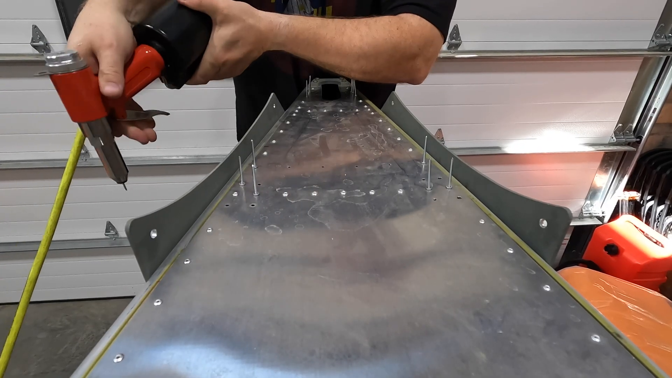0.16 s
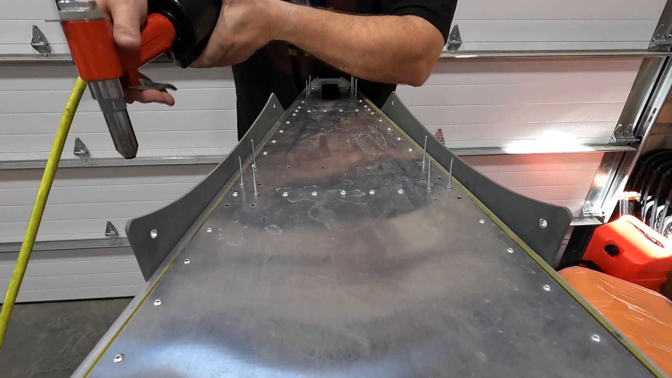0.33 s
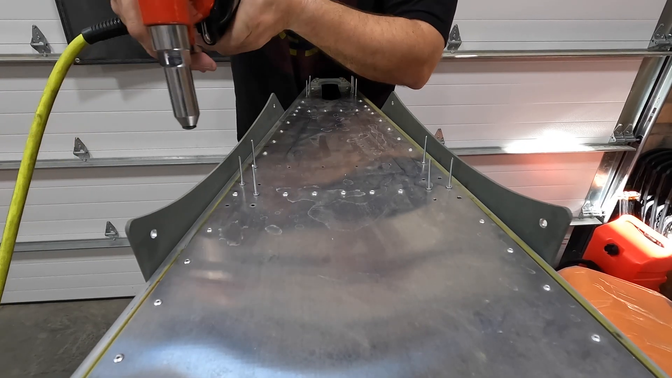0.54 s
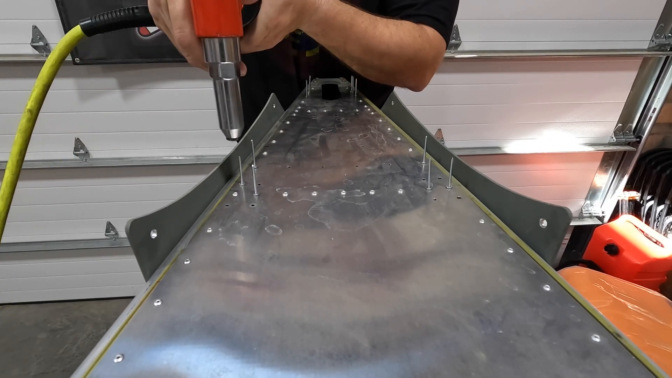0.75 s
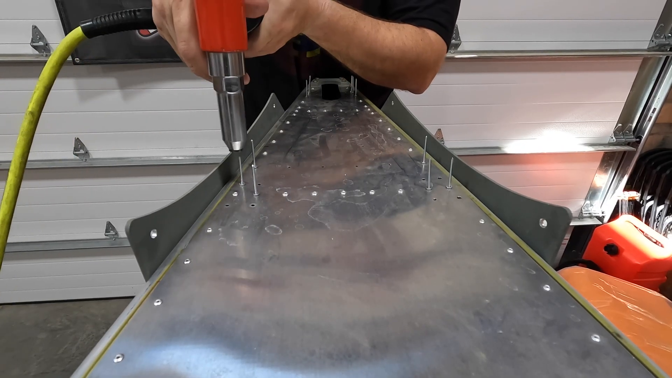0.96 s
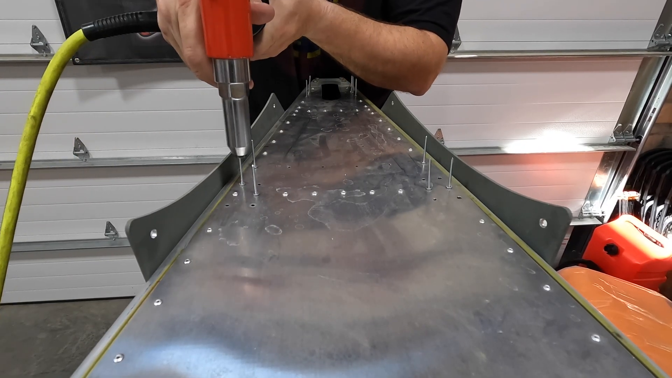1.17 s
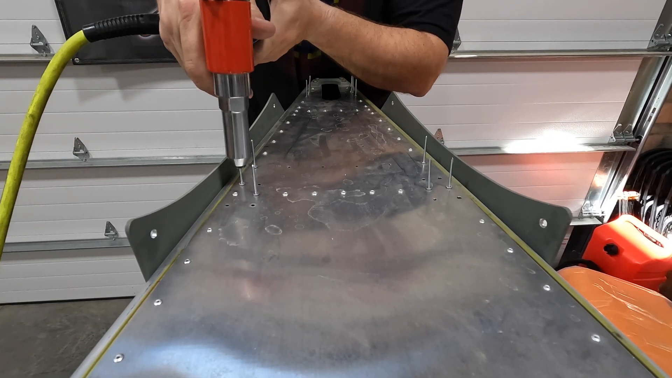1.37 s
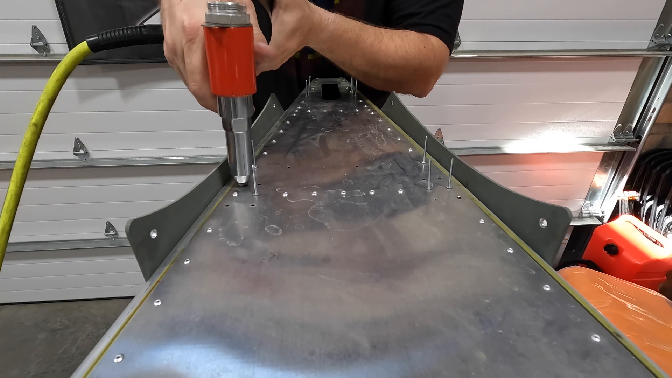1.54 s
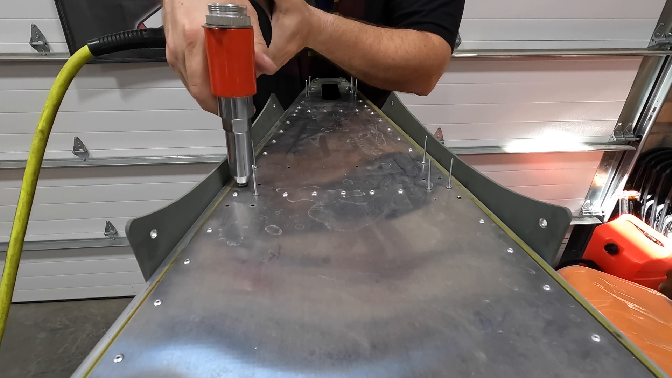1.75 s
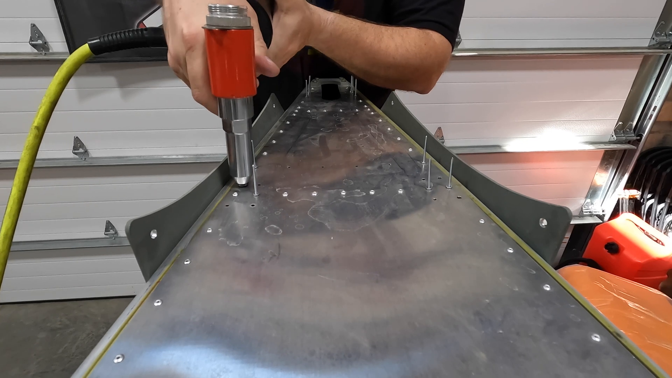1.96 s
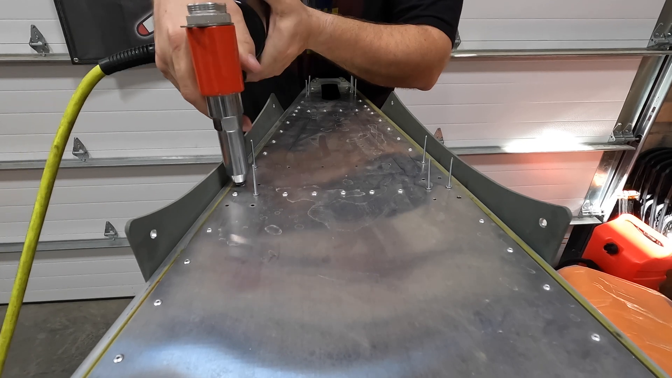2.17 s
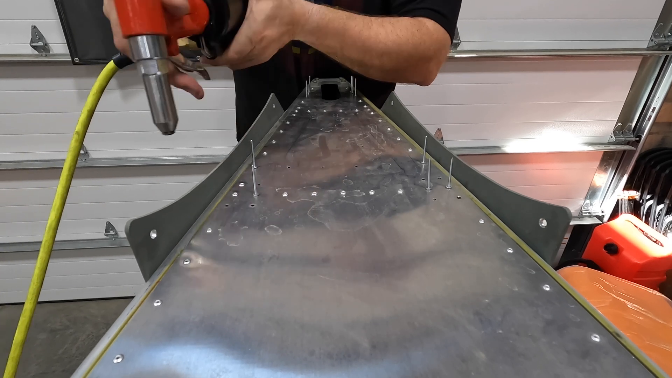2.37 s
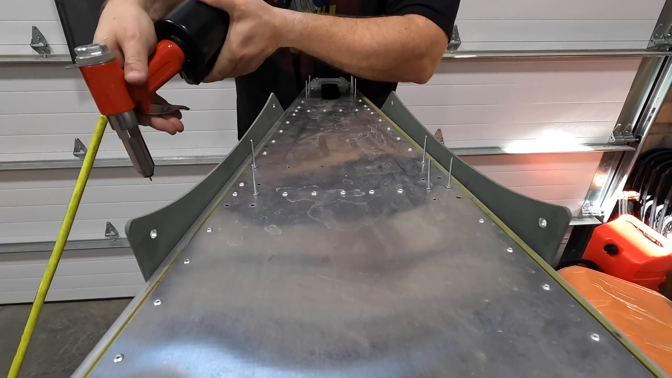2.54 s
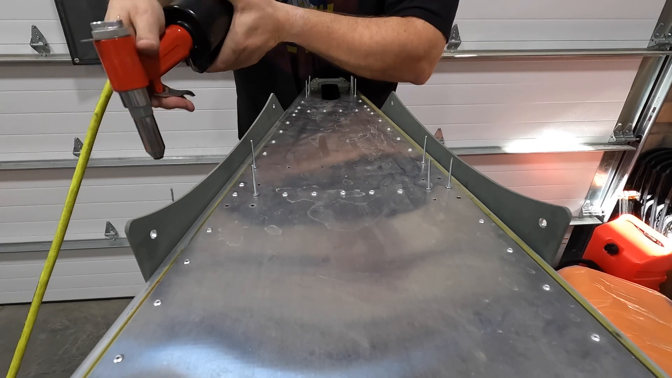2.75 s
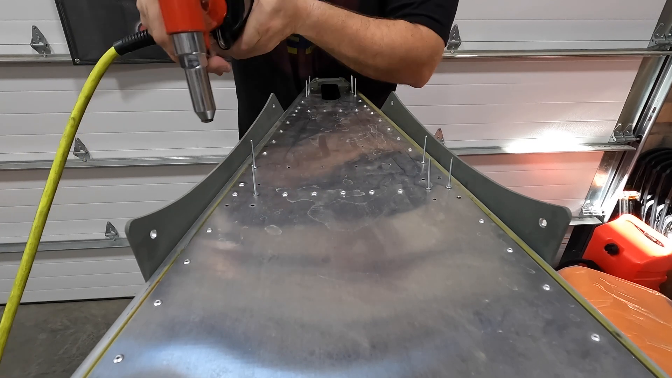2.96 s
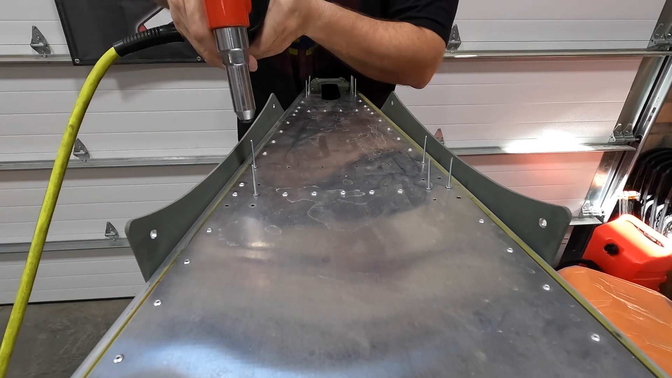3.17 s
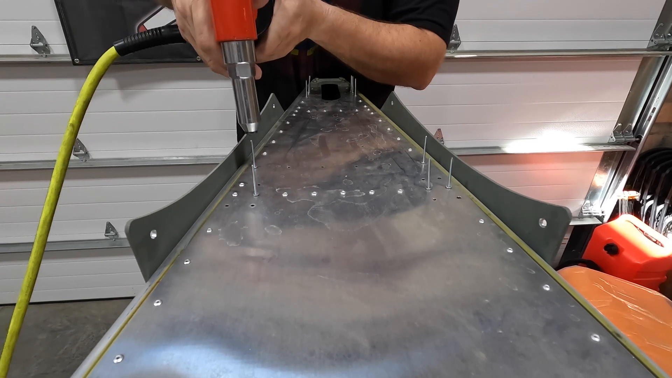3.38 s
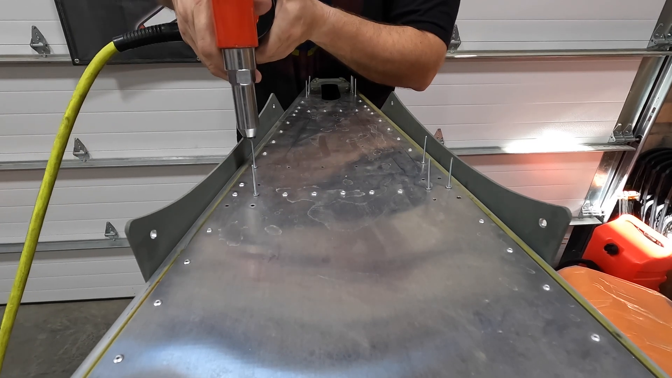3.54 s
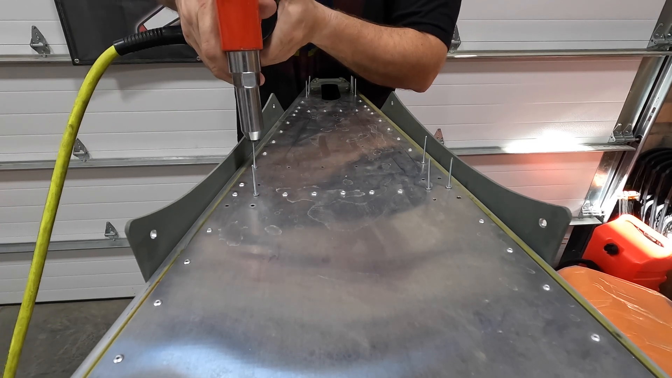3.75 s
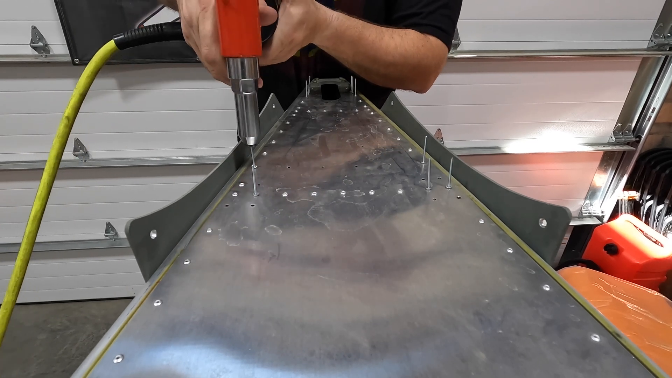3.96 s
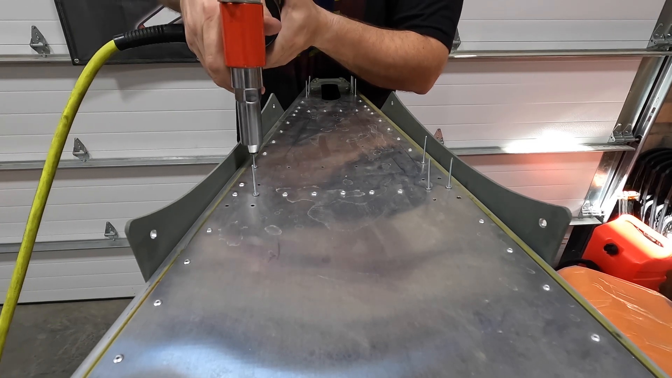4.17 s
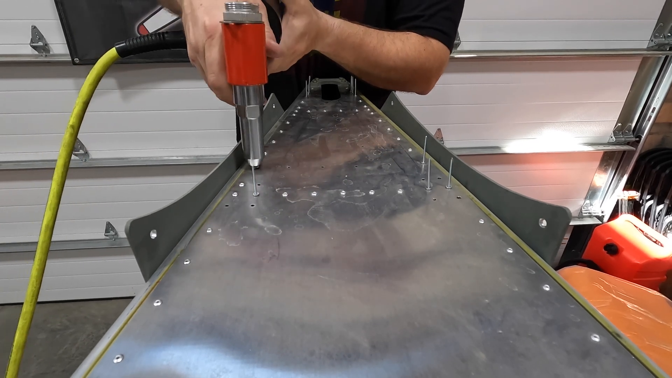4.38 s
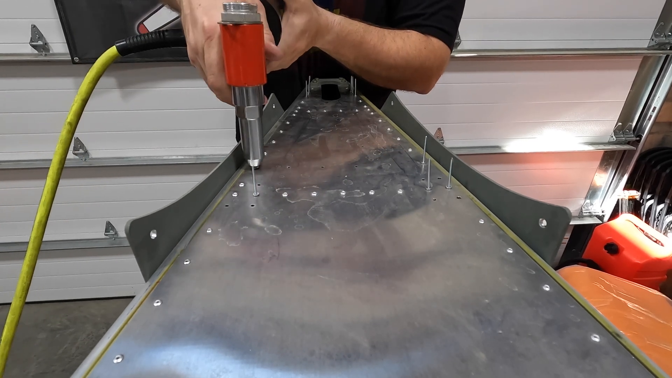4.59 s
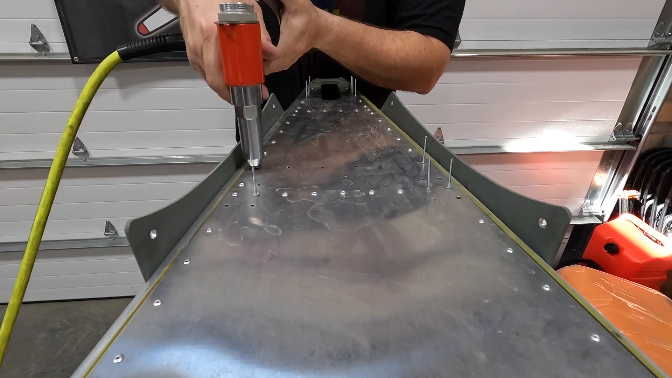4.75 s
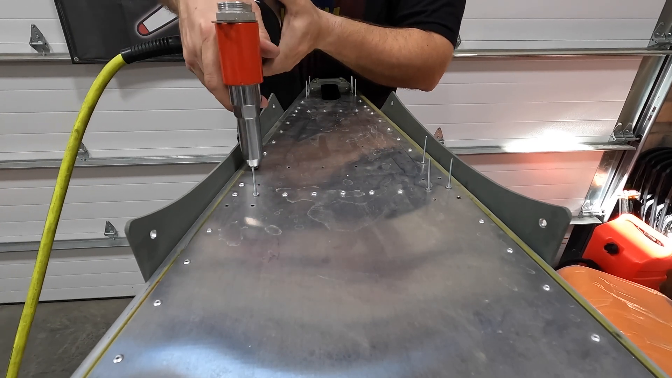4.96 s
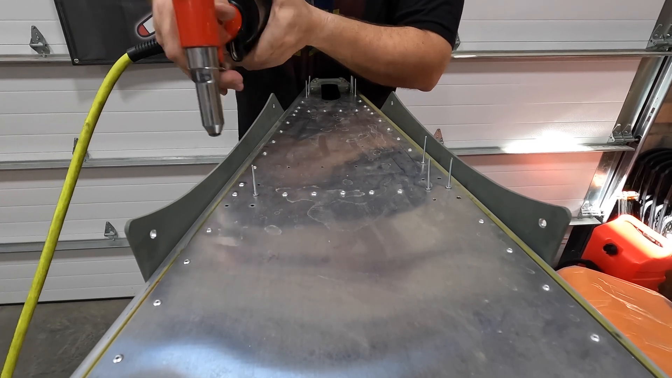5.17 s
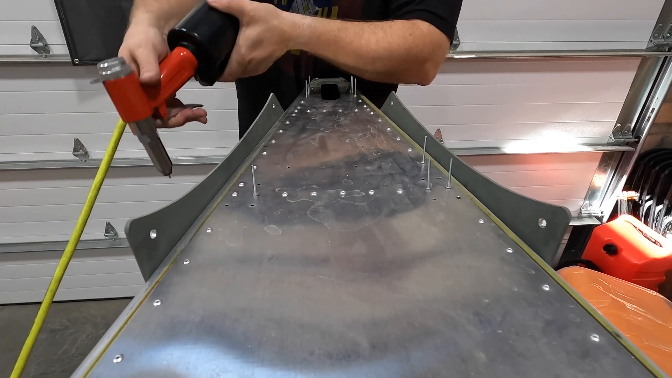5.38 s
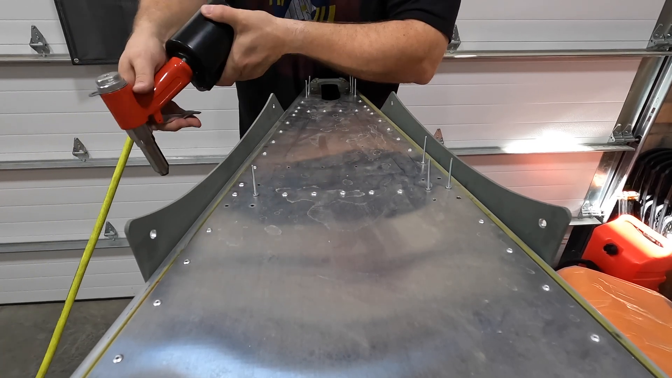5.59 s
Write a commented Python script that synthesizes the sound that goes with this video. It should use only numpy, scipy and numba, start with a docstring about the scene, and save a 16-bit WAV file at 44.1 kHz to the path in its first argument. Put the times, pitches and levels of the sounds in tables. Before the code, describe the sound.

Close metallic taps, two sharp booming rivet snaps with hissing air exhausts, and a steady low machine hum behind in a workshop.

```python
"""In a workshop a pneumatic riveter, still hissing from its last pull, sets two more rivets in a large aluminium sheet.
Close by, the nose knocks on the sheet before each pull, with one faint extra touch between the two.
On a pull air drives the piston, the mandrel snaps, the cylinder vents and a thin hiss lingers.
Struck modes make the metal, shaped noise the air, and shaft harmonics the pump that hums quieter to the left.
The camera's gain control ducks at the loud blows and lets the hum creep back up."""
import sys
import numpy as np
from scipy import signal
from scipy.fft import rfft, irfft
from scipy.io import wavfile
from scipy.ndimage import uniform_filter1d
from numba import njit

SR = 44100
rng = np.random.default_rng(int(sys.argv[2]) if len(sys.argv) > 2 else 0)


def to_wav(s):
    """Save 16-bit WAV."""
    ch = np.atleast_2d(s).T  # columns
    pcm = np.round(np.clip(ch, -1, 1) * 32767)  # PCM
    wavfile.write(sys.argv[1], SR, pcm.astype(np.int16))


N = 247842
T = np.arange(N) / SR
FREQ = np.fft.rfftfreq(N, 1 / SR)

# Levels in the tables are relative within each source.
# trigger pulls, the first already dying away: mandrel snap t/s, crack level/dB, body ring level/dB,
# brightness f/Hz, mandrel ping level/dB, groan level/dB, piston kick level/dB, jaw grip level/dB,
# recoil level/dB, clank level/dB, valve shutting level/dB, stroke air level/dB, vent level/dB,
# vent hold t/s, leak level/dB
PULLS = [(-0.305, -3, -12, 11000, -10.5, -29, -1, -5, -4.5, -20, -39, -20, -26.5, 0.11, -35),
         (2.183, -2.5, 4.5, 11700, -28, -16.5, -7.5, -18, -6.5, -23, -18.5, -16.5, -14, 0.097, -33),
         (5.0231, -0.5, 1.5, 10300, 8, -11.5, -7, -10.5, -9, -12, -21.5, -15, -14.5, 0.12, -30.5)]
# the nose lands and bounces once: t/s, crack level/dB, body ring level/dB, bounce level/dB,
# clank level/dB, boom level/dB
LANDINGS = [(1.703, -20.5, -28, -3, -17, -15), (3.864, -57, -57, -14, -36, -32),
            (4.4845, -19.5, -12.5, -2.5, -14, -15)]
# light ticks before the first landing, then a last contact of the nose as it settles:
# t/s, crack level/dB, body ring level/dB, brightness f/Hz
LIGHT_CONTACTS = [(0.503, -38, -55, 12000), (1.335, -33, -27, 7500), (1.35, -32, -30, 7500),
                  (1.7122, -23.5, -19, 5500)]
# every pull: stroke before the snap, release after the snap, valve shutting after the release
STROKE_S, RELEASE_S, SETTLE_S = .087, .069, .576
BOUNCE_S = 0.0076  # from a landing to its bounce


def undb(db):
    """Decibels to gain."""
    return 10 ** (np.asarray(db) / 20)


def level(x, db):
    """Scale to an rms level."""
    return x * undb(db) / np.sqrt(np.mean(x ** 2))


def gains(points):
    """Gain of an (f/Hz, level/dB) spectrum at every frequency, falling away below it and level above."""
    hz, db = np.transpose(points)
    shape = undb(np.interp(np.log(FREQ + 1), np.log(hz), db))
    return shape * np.minimum(FREQ / hz[0], 1) ** 2


def colour(x, points):
    """Give a signal a spectrum, at unit rms."""
    return level(irfft(rfft(x) * gains(points), N), 0)


def noise(points):
    """Fresh noise with a spectrum, at unit rms."""
    return colour(rng.standard_normal(N), points)


def band(hz, width_hz):
    """Noise in one resonance, at unit rms; its centre may move."""
    lowpass = signal.butter(2, width_hz / 2, fs=SR, output="sos")
    slow = signal.sosfilt(lowpass, rng.standard_normal((2, N)))
    angle = 2 * np.pi * np.cumsum(hz * np.ones(N)) / SR
    return level(slow[0] * np.cos(angle) + slow[1] * np.sin(angle), 0)


def fade(t60, size=SR):
    """Exponential decay, down 60 dB after t60 seconds."""
    return np.exp(-np.log(1000) * T[:size] / t60)


def ring(modes):
    """One second of modes (f/Hz, level/dB, t60/s) struck together."""
    return sum(undb(db) * fade(t60) * np.sin(2 * np.pi * hz * T[:SR]) for hz, db, t60 in modes)


def add(track, s, sound):
    """Mix a sound into a track at a time, which may lie before the start."""
    i = int(s * SR)
    part = sound[max(-i, 0):max(N - i, 0)]
    track[max(i, 0):max(i, 0) + len(part)] += part


def walk(rate):
    """Slow random wander, with about rate independent values a second."""
    k = int(SR / rate)
    return uniform_filter1d(np.repeat(rng.standard_normal(N // k + 1), k), k)[:N]


def gate(start, end, ramp_s):
    """A valve that starts to open at one time and to close at another."""
    return np.clip((T - start) / ramp_s, 0, 1) * np.clip(1 - (T - end) / ramp_s, 0, 1)


def pump(hum_db=-27.0, whine_db=-36.5, clatter_db=-37.5, rush_db=-34, wobble=.004, throb=0.034,
         scatter=1.0, treble_hz=3000, shaft_hz=28.256):
    """Shaft harmonics, a casing whine that swells once a turn, clatter repeating each turn, and rushing air."""
    # shaft harmonics, then casing whine: multiple of the shaft rate, level/dB
    hum_partials = [(1, -11), (2, 3), (3, -7), (4, 0.5), (5, -8), (6, -6), (7, -25), (8, -5), (9, -12),
                    (10, -7.5), (11, -7.5), (12, -24), (13, -8.5), (14, 2), (15, -7.5), (16, -11.5),
                    (17, -13.5), (18, -9), (19, -13.5), (20, -16.5), (21, -25.5)]
    whine_partials = [(40, 1.5), (44, -3), (46, 6.5), (47, 1), (48, 5.5), (49, 7.5), (50, 4.5), (51, 2),
                      (54, -18), (59, -11), (62, -5), (63, -6), (91, -8), (94, -8.5), (151, -19),
                      (165, -16)]
    # spectra of the clatter and of the rushing air: f/Hz, level/dB per Hz
    clatter_spectrum = [(500, -9.5), (650, -5), (800, -1), (1100, 5), (1500, 5), (1750, 6), (2000, 0.5),
                        (2300, -5.5), (2600, 3.5), (2900, -11), (4000, -9), (4700, -7), (5200, -19.5),
                        (7000, -22), (12000, -43)]
    rush_spectrum = [(20, -32), (45, 1.5), (78, 6.5), (150, 4), (260, -9), (650, -10), (1300, -3.5),
                     (2500, -11.5), (3000, -18), (4700, -20.5), (5200, -29.5), (7000, -27), (8200, -40),
                     (12000, -43.5), (15000, -85)]
    # treble change of clatter and rush: t/s, level/dB
    treble_curve = [(0.6, -2.5), (1.5, -0.5), (3.1, 2), (3.8, 4), (4.6, 4), (5.5, 1.5)]
    turns = shaft_hz * T + wobble * walk(3) - .6
    angle = 2 * np.pi * turns
    hum = sum(undb(db) * np.cos(round(k) * angle + 2 * np.pi * rng.random()) for k, db in hum_partials)
    # loosely aligned phases bunch the whine once a turn
    whine = sum(undb(db) * np.cos(round(k) * angle + scatter * rng.standard_normal())
                for k, db in whine_partials)
    one_turn = rng.standard_normal(int(SR / shaft_hz))
    place = (turns % 1 * len(one_turn)).astype(int) % len(one_turn)
    clatter = colour(one_turn[place], clatter_spectrum)
    rush = noise(rush_spectrum) * (1 + throb * np.cos(angle)) * undb(0.038 * walk(3.2))
    bed = level(clatter, clatter_db) + level(rush, rush_db)
    treble = irfft(rfft(bed) * FREQ ** 4 / (FREQ ** 4 + treble_hz ** 4), N)
    bed = bed + treble * (undb(np.interp(T, *np.transpose(treble_curve))) - 1)
    return level(hum, hum_db) + level(whine, whine_db) * undb(0.24 * walk(9.6)) + bed


def workshop(x, t60=0.57):
    """Diffuse reflections, as a decaying coloured noise tail that starts 4 ms after the direct sound."""
    spectrum = [(60, 4.0), (2500, 3.5), (7000, -4.5), (15000, 2.0)]
    tail = noise(spectrum)[:SR] * fade(t60) * (T[:SR] > .004)
    return signal.fftconvolve(x, tail / np.linalg.norm(tail))[:N]


def strain(rise_s=0.059, fall_db_per_s=45, creak_db=-5, creak_hz=720, creak_width_hz=110,
           sag_per_s=6.0, creak_fall_db_per_s=70):
    """The sheet groans while the rivet swells in its hole, with a creak that sinks in pitch."""
    # groan of the sheet under the pull: f/Hz, level/dB per Hz
    groan_spectrum = [(80, 9), (110, -5), (165, 2.5), (230, 7), (320, 0), (420, -5.5), (530, -3.5),
                      (700, -17.5), (1100, -12.5), (1800, -26), (3000, -33)]
    load, creak = np.zeros((2, N))
    for s, _, _, _, _, groan_db, *_ in PULLS:
        trigger = s - STROKE_S
        age = np.clip(T - trigger, 0, STROKE_S + rise_s)
        pull = gate(trigger, s, rise_s) * undb(groan_db - fall_db_per_s * age)
        load += pull
        sinking = band(creak_hz * np.exp(-sag_per_s * age), creak_width_hz)
        creak += pull * undb(creak_db - creak_fall_db_per_s * age) * sinking
    return noise(groan_spectrum) * load + creak


def thumps(overtone_ratio=1.6, overtone_db=-15):
    """The panel flexes in round thumps, some short, some droning on as the sheet groans under the pull."""
    # the panel flexes as the tool seats, pulls and jumps: t/s, f/Hz, level/dB, t60/s
    flexes = [(1.7209, 153, -10.5, 0.17), (1.755, 126, -17, .18), (2.1, 116.6, -9.5, 0.22),
              (2.1939, 148.4, -3.5, 0.1), (2.216, 171.7, -9.5, 0.78), (4.4908, 157.7, -9.5, 0.12),
              (4.513, 166, -11, 0.18), (4.588, 116, -16, 0.17), (4.949, 177.6, -7.5, 0.69),
              (4.983, 112, -11, 0.2), (5.033, 160, -7.5, 0.28)]
    out = np.zeros(N)
    for s, hz, db, t60 in flexes:
        add(out, s, undb(db) * ring([(hz, 0, t60), (hz * overtone_ratio, overtone_db, t60)]))
    return out


def shoves():
    """Pushes on the sheet (t/s, level/dB, contact/ms): landings, then each pull's kick, grip, recoil, return."""
    touch_db, touch_ms = -15.5, 0.59  # touch level is relative to the boom
    seat_s, seat_ms = 0.0029, 5.2  # the tool's weight follows the first touch
    kick_ms, grip_ms, recoil_ms, return_ms = 4.5, 1.23, 1.27, 0.76
    grip_lag_s, recoil_lag_s = 0.00935, 0.0022  # after the trigger; after the snap
    return_db = -16.5  # the piston springs back on release
    rows = []
    for s, *_, boom_db in LANDINGS:
        rows += [(s + BOUNCE_S, boom_db + touch_db, touch_ms), (s + seat_s, boom_db, seat_ms)]
    for s, _, _, _, _, _, kick_db, grip_db, recoil_db, *_ in PULLS:
        trigger = s - STROKE_S
        rows += [(trigger, kick_db, kick_ms), (trigger + grip_lag_s, grip_db, grip_ms),
                 (s + recoil_lag_s, recoil_db, recoil_ms), (s + RELEASE_S, return_db, return_ms)]
    return rows


def sheet(modes_db=-5, wash_db=-6.5, wash_t60=0.94, travel_s=0.012):
    """Shoves set the sheet booming; a longer contact favours the lower modes."""
    # sheet and frame modes: f/Hz, level/dB, t60/s
    sheet_modes = [(61.9, 1, 0.62), (76.1, -7, 1.82), (93, -3.5, 1.27), (132, -8.5, 0.85),
                   (154.3, -3.5, 1.92), (168.6, 6, 1.05), (220.4, -2.5, 0.96), (245, -12, 0.39),
                   (297.6, -2.5, 0.75), (328, -5.5, 0.69), (450, -11, 0.15), (514.4, -4, 0.3)]
    # dense low modes heard as a wash: f/Hz, level/dB per Hz
    wash_spectrum = [(25, 1), (60, -16), (130, 2.5), (190, 4.5), (260, -22), (350, -13), (550, -13),
                     (900, -16), (1500, -49), (3000, -50)]
    body = np.zeros(N)
    for k, mode in enumerate(sheet_modes):
        # bending waves are slower at low pitch; travel_s is for the lowest mode
        add(body, travel_s * sheet_modes[0][0] / mode[0], (-1) ** k * ring([mode]))
    out, wash = np.zeros(N), noise(wash_spectrum)
    for s, db, contact_ms in shoves():
        push = np.exp(-T[:SR // 20] * 1000 / (contact_ms / np.pi))
        dense = np.roll(wash, rng.integers(N))[:SR] * fade(wash_t60)
        blow = undb(modes_db) * body[:SR] + undb(wash_db) * dense
        add(out, s, undb(db) * signal.fftconvolve(blow, push / push.sum()))
    return out


def air(scatter=0.15, flutter_db=-0.05, valve_s=0.016, broad_db=-1.5, drift=.006):
    """The jet hisses in gliding resonances on stroke and vent; the valve leaks and whistles until it shuts."""
    # spectra of the jet, the leak and the whistle: f/Hz, level/dB per Hz
    jet_spectrum = [(150, 25.5), (400, 2.5), (750, -7), (1400, 3.5), (2000, 2), (2500, 2), (3900, -5),
                    (4700, -1.5), (6000, 0), (7500, -7), (8600, -10), (10300, -7), (11200, -9),
                    (13000, -17), (15500, -26)]
    leak_spectrum = [(600, -14), (1400, 10), (2000, 16.5), (2600, 17.5), (3200, 8.5), (3800, 11.5),
                     (4400, 3), (5300, 8), (6200, -10), (7600, -29), (8800, -11), (10300, -5), (12200, -5),
                     (14000, -14), (15500, -24)]
    whistle_spectrum = [(8500, -37), (10200, 6), (11000, -4), (12200, 5), (13500, -19), (15500, -26)]
    # resonances of the air jet: f/Hz, width f/Hz, level/dB
    jet_resonances = [(5430, 500, -18), (6560, 380, -19.5), (7830, 730, -14.5), (9870, 600, -20.5),
                      (12240, 550, -26.5)]
    # they shift with the way the tool is held: t/s, frequency ratio
    jet_glide = [(2.1, 1), (2.28, 0.98), (2.41, .94), (2.6, 0.94), (4.94, .86), (5.26, 0.8), (5.38, 0.93)]
    vent_rise_s, vent_fall_db_per_s = 0.0087, 124  # the vent holds, then falls fast to a slower tail
    tail_db, tail_fall_db_per_s = -11.5, 21  # tail level is relative to the vent
    leak_fall_db_per_s, shut_s = 10.5, 0.027
    whistle_db, whistle_peak_s, whistle_slope_db_per_s = -13, 0.46, 80  # level is relative to the leak
    echo_unit_ms, echo_sway = 0.4014, 0.046  # each reflection lags by a multiple of a wandering unit
    flow, leak, whistle = np.zeros((3, N))
    for s, *_, stroke_db, vent_db, hold_s, leak_db in PULLS:
        release = s + RELEASE_S
        shut = release + SETTLE_S
        age = np.clip(T - release, 0, SETTLE_S)
        vent = undb(vent_db - vent_fall_db_per_s * np.maximum(age - hold_s, 0))
        vent = vent + undb(vent_db + tail_db - tail_fall_db_per_s * age)
        flow = flow + undb(stroke_db) * gate(s - STROKE_S, s, valve_s)
        flow = flow + vent * gate(release, shut, vent_rise_s)
        ajar = gate(release, shut, shut_s)
        leak = leak + ajar * undb(leak_db - leak_fall_db_per_s * age)
        off_peak_s = np.abs(age - whistle_peak_s)
        whistle = whistle + ajar * undb(leak_db + whistle_db - whistle_slope_db_per_s * off_peak_s)
    tune = np.interp(T, *np.transpose(jet_glide)) * (1 + drift * walk(12))
    jet = undb(broad_db) * noise(jet_spectrum)
    jet = jet + sum(undb(db) * band(hz * tune, width) for hz, width, db in jet_resonances)
    hiss = jet * flow * undb(flutter_db * walk(50))
    hiss = hiss + noise(leak_spectrum) * leak + noise(whistle_spectrum) * whistle
    lag = echo_unit_ms * (1 + echo_sway * walk(4)) / 1000
    # reflections off the hands and the sheet ripple the hiss finely
    far = sum(np.interp(T - lag * times, T, hiss) for times in rng.uniform(2.04, 10.22, size=4))
    return hiss + scatter * far


def clank(s, next_hole_s=3):
    """The sheet's ring at the hole being worked at that time."""
    # depends on where the nose lands: f/Hz, level/dB at the first hole, level/dB at the second, t60/s
    hole_modes = [(657, -12, -12.5, 0.18), (742, -3, -16, 0.15), (802, -11, -14, 0.11),
                  (910, -7.5, -9.5, 0.17), (1100, -17, -2, 0.06), (1514, -16, -3, 0.056),
                  (1806, -15, -7, 0.14), (2457, -9, -1.5, 0.044)]
    return ring([(hz, first_db if s < next_hole_s else second_db, t60)
                 for hz, first_db, second_db, t60 in hole_modes])


def clanks(jaws_db=-12, jaws_lag_s=0.00452, build_s=0.0033, tink_db=-40):
    """The sheet clanks at landings and snaps, biting jaws ring; the mandrel tinks touched, pings breaking."""
    # modes of the jaws, of the breaking mandrel and of a lightly touched one: f/Hz, level/dB, t60/s
    jaw_modes = [(1127, 0, .05), (2215, 2, 0.076), (2476, 3.5, 0.071)]
    mandrel_modes = [(5050, -4.5, 0.0076), (6440, -8.5, 0.0078)]
    tink_mode = (12100, 0, 0.019)
    out = np.zeros(N)
    for s, *_, clank_db, _ in LANDINGS:
        add(out, s, undb(clank_db) * clank(s) * (1 - np.exp(-T[:SR] / build_s)))
    for s, _, _, _, ping_db, _, _, grip_db, _, clank_db, *_ in PULLS:
        add(out, s, undb(clank_db) * clank(s))
        add(out, s - STROKE_S + jaws_lag_s, undb(jaws_db + grip_db) * ring(jaw_modes))
        add(out, s, undb(ping_db) * ring(mandrel_modes))
    add(out, LIGHT_CONTACTS[0][0], undb(tink_db) * ring([tink_mode]))
    return out


def impacts():
    """Light contacts, landings, valve clicks, snaps: t/s, crack level/dB, body ring level/dB, brightness f/Hz."""
    landing_hz = 6100
    valve_opens = (-15.5, -17, 5600)  # crack level/dB, body ring level/dB, brightness f/Hz
    valve_shuts = (-44, 4300)  # body ring level/dB, brightness f/Hz
    rows = list(LIGHT_CONTACTS)
    for s, crack_db, body_db, bounce_db, *_ in LANDINGS:
        rows += [(s, crack_db, body_db, landing_hz),
                 (s + BOUNCE_S, crack_db + bounce_db, body_db + bounce_db, landing_hz)]
    for s, crack_db, body_db, bright_hz, *_, shut_db, _, _, _, _ in PULLS:
        rows += [(s - STROKE_S, *valve_opens), (s, crack_db, body_db, bright_hz),
                 (s + RELEASE_S + SETTLE_S, shut_db, *valve_shuts)]
    return rows


def snaps(crack_t60=.016, edge_db=-20, edge_t60=0.0054, ring_db=-3, zing_db=-21, zing_t60=0.6):
    """A sharp crack, slightly harder at its onset; the tool body rings, metal round the rivet zings on."""
    # spectrum of the crack: f/Hz, level/dB per Hz
    crack_spectrum = [(650, -23), (1100, 11.5), (1350, 4), (1750, 6), (2500, 10.5), (4000, 1), (6000, 5),
                      (8500, -2), (11500, 0.5), (15500, -10)]
    # riveter body modes: f/Hz, level/dB, t60/s
    tool_modes = [(1037, -13.5, 0.11), (1250, -1, 0.037), (1316, -8.5, 0.1), (2680, -19, 0.025),
                  (4060, -24, 0.018), (5640, -16, 0.009)]
    out, crack = np.zeros(N), noise(crack_spectrum)
    zing = noise([(500, -11), (950, 7.5), (1300, 9.5), (1700, -1.5), (3000, -12.5), (7000, -16.0), (15000, -36)])
    for s, crack_db, body_db, bright_hz in impacts():
        shift = rng.integers(N)
        burst = np.roll(crack, shift)[:SR] * (fade(crack_t60) + undb(edge_db) * fade(edge_t60))
        body = undb(ring_db) * ring(tool_modes)
        body = body + undb(zing_db) * np.roll(zing, shift)[:SR] * fade(zing_t60)
        # a knock is duller than breaking steel
        dull = signal.butter(2, min(bright_hz, SR / 2 - 1), fs=SR, output="sos")
        add(out, s, signal.sosfilt(dull, undb(crack_db) * burst + undb(body_db) * body))
    return out


def ports(x, lean, wet_db, diffuse_db):
    """Two close microphone ports: direct sound differs in phase (lean/rad tilts the level), echoes at random."""
    # difference between the ports: f/Hz, side minus mid level/dB
    port_spectrum = [(60, -23.5), (200, -38), (380, -22), (700, -14.5), (1290, -13), (2500, -6),
                     (4400, -6.5), (8100, -38.5), (14000, -3)]
    mid = x + undb(wet_db) * workshop(x)
    difference = -1j * np.exp(1j * lean) * rfft(x) + undb(diffuse_db) * rfft(workshop(x))
    side = irfft(difference * gains(port_spectrum), N)
    return np.array([mid + side, mid - side])


def scene():
    """The tool and sheet close by to the right, the pump quieter to the left."""
    work = sheet() + thumps() + snaps() + clanks() + strain() + air()
    close = ports(work, lean=-0.38, wet_db=-12.0, diffuse_db=-3)
    background = ports(pump(), lean=0.28, wet_db=-23.5, diffuse_db=-8.0)
    return close + background


@njit
def ducking(over_db, start_db, attack, recover_db, ease):
    """Gain reduction in dB: it chases any excess quickly and recovers slowly, easing off near full gain."""
    out, cut = np.empty(len(over_db)), start_db
    for i in range(len(over_db)):
        if over_db[i] > cut:
            cut += (over_db[i] - cut) * attack
        else:
            cut -= recover_db * cut / (cut + ease)
        out[i] = cut
    return out


def record(dry, ceiling_db=-6.5, start_db=8.0, attack_s=0.0011, recover_db_per_s=7.0, ease_db=0.71,
           top_hz=14500):
    """Automatic gain control, clipping at full scale and the treble cut-off."""
    over_db = 20 * np.log10(np.abs(dry).max(axis=0) + 1e-9) - ceiling_db
    cut_db = ducking(over_db, float(start_db), 1 / (attack_s * SR), recover_db_per_s / SR, float(ease_db))
    wet = np.clip(dry * undb(-cut_db), -1, 1)
    return signal.sosfilt(signal.ellip(10, .2, 80, top_hz, fs=SR, output="sos"), wet)


dry = scene()
out = record(dry)
to_wav(out)
```